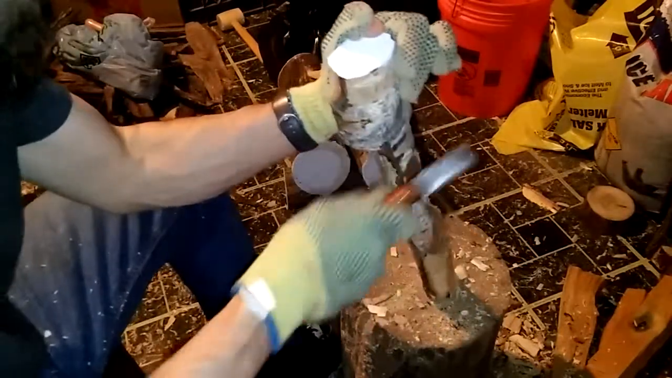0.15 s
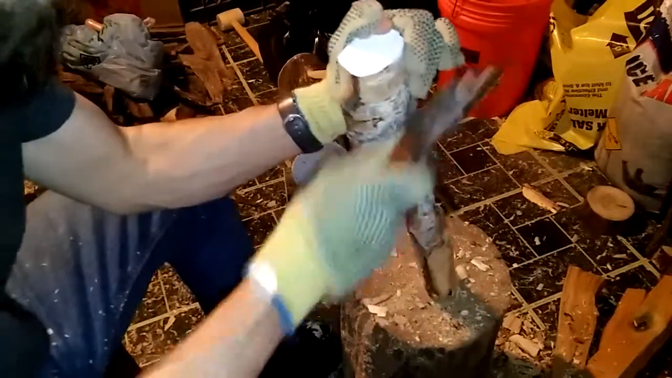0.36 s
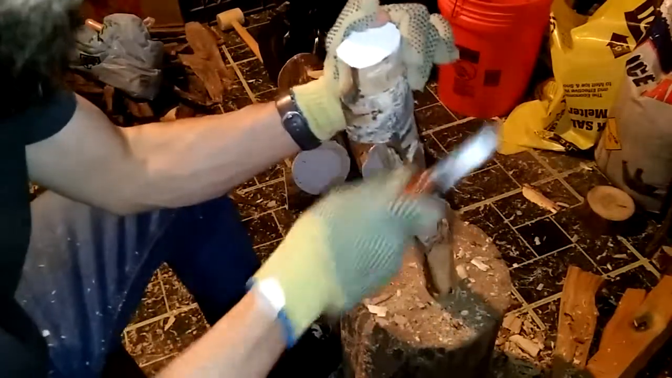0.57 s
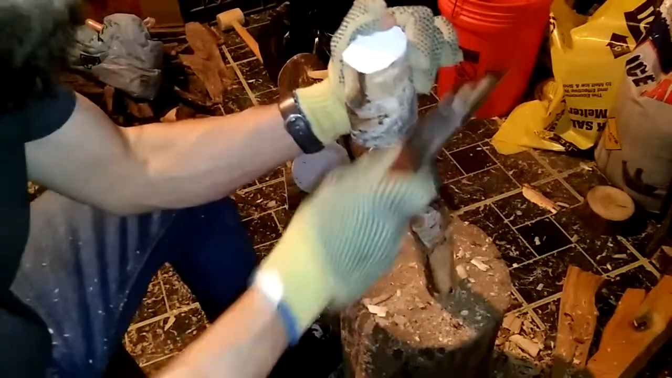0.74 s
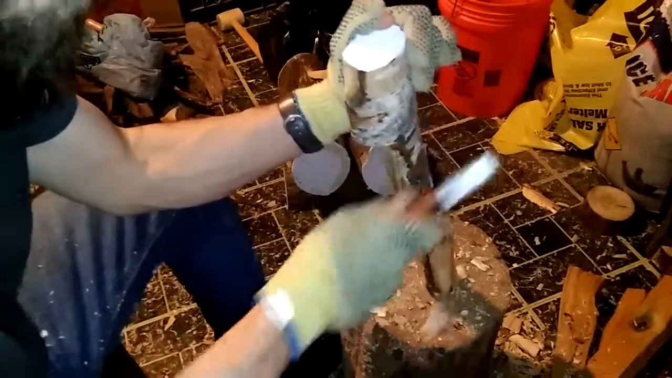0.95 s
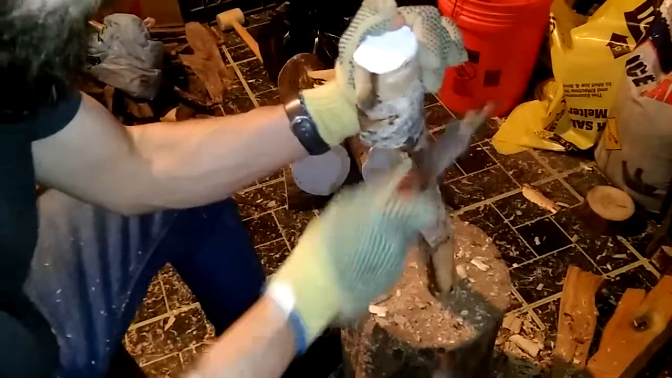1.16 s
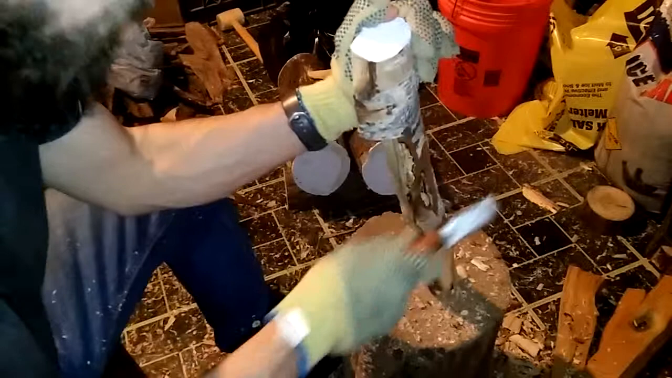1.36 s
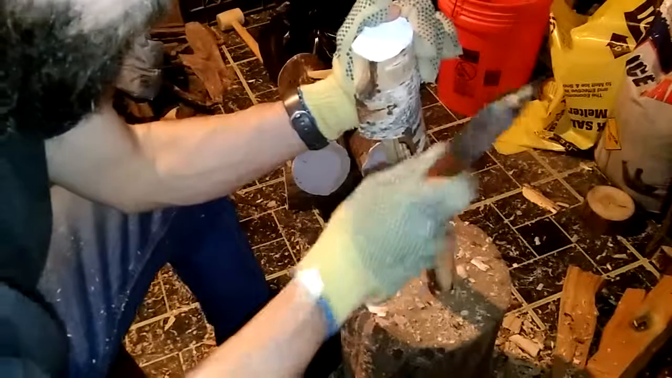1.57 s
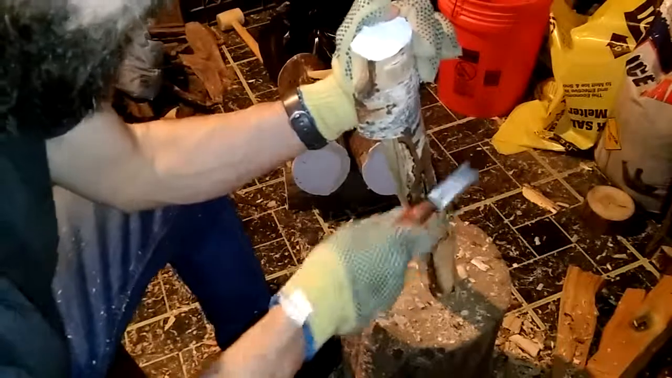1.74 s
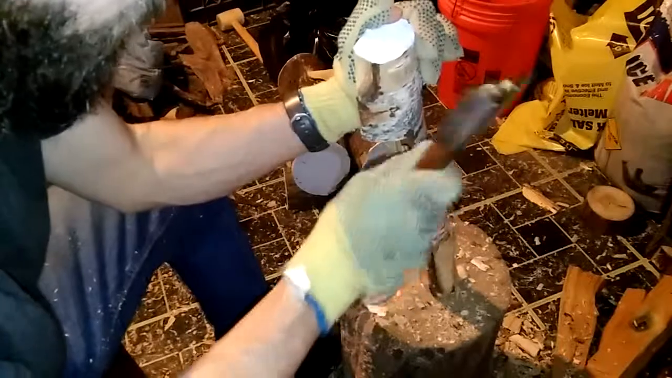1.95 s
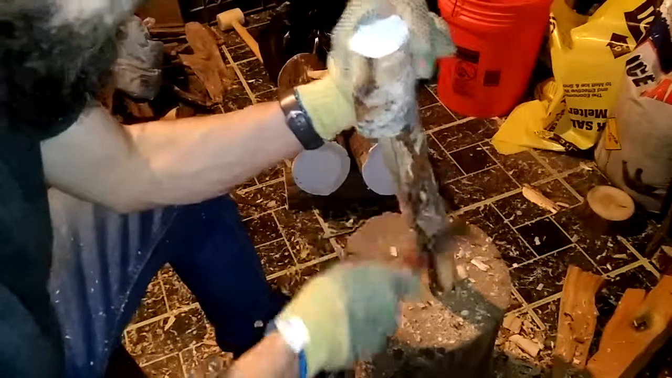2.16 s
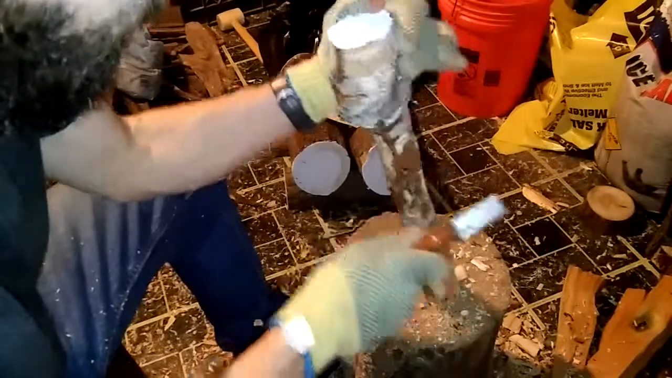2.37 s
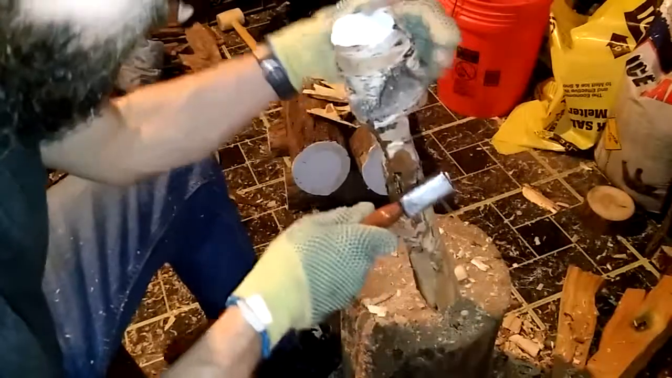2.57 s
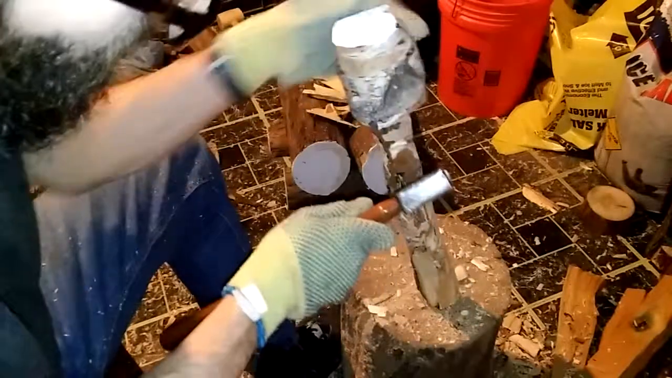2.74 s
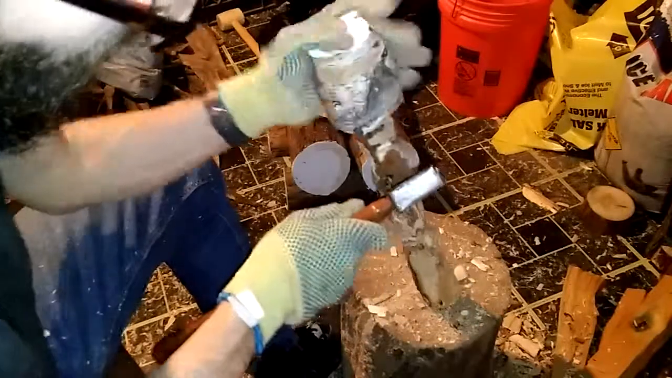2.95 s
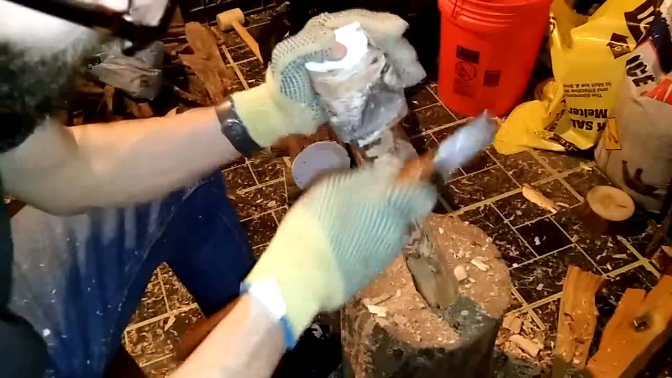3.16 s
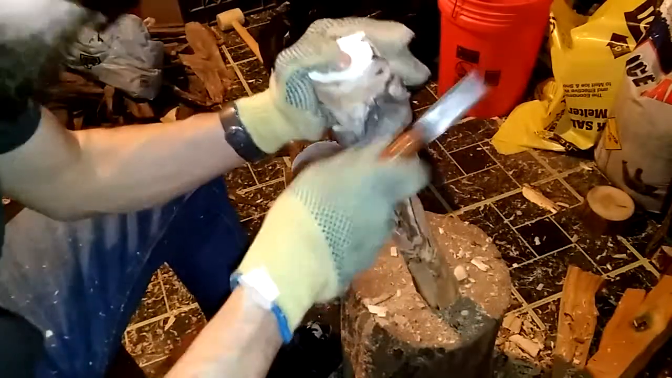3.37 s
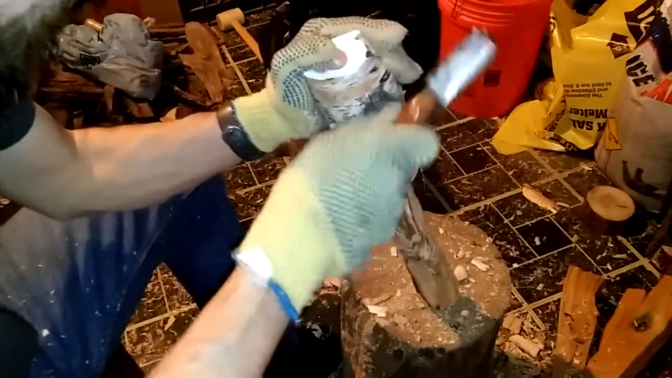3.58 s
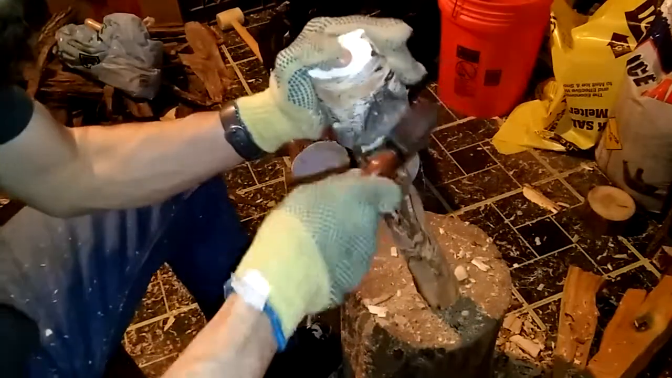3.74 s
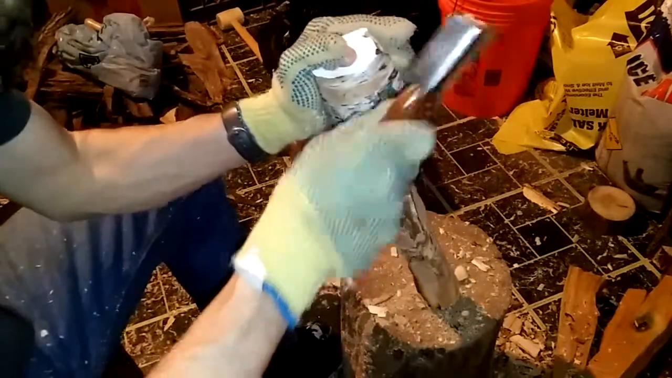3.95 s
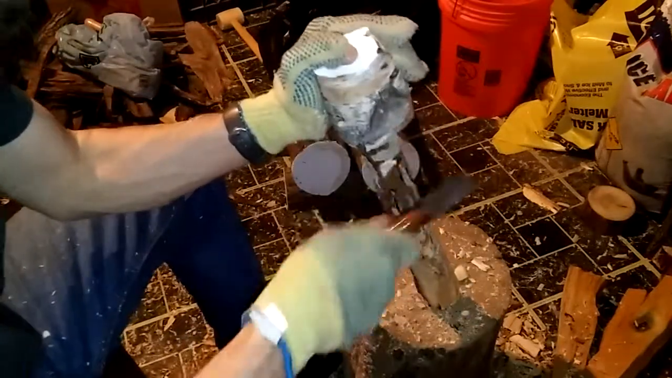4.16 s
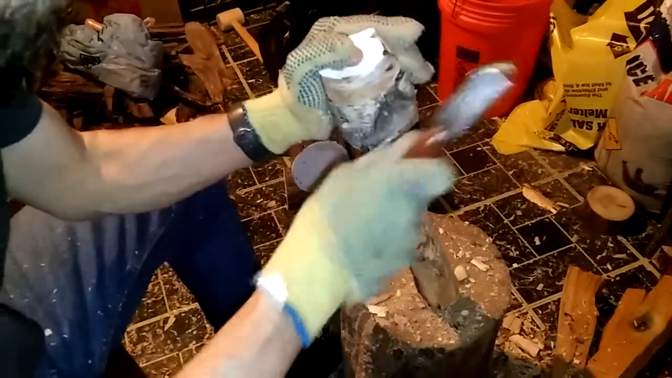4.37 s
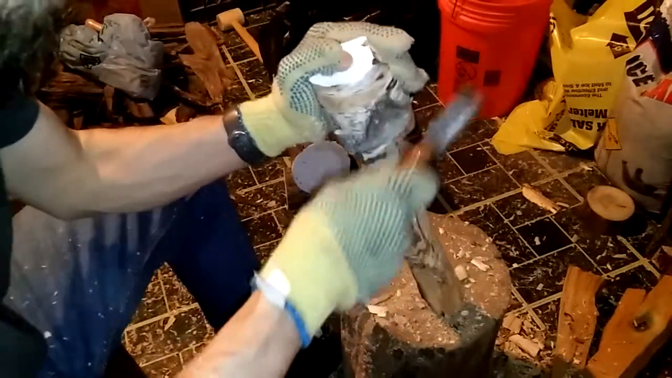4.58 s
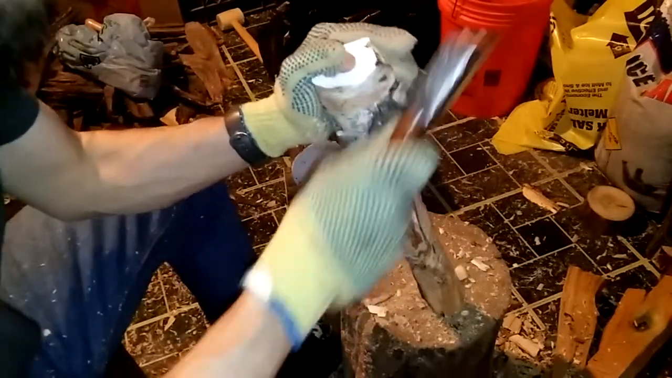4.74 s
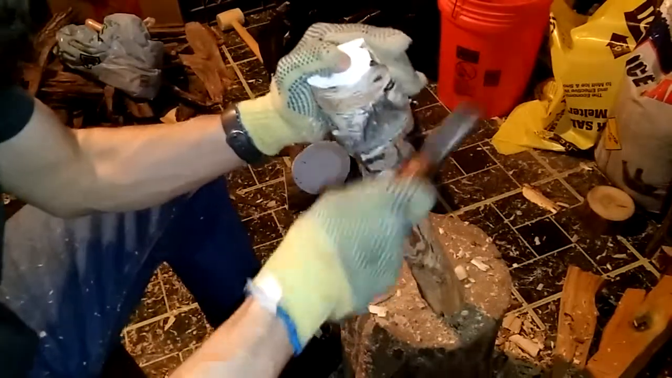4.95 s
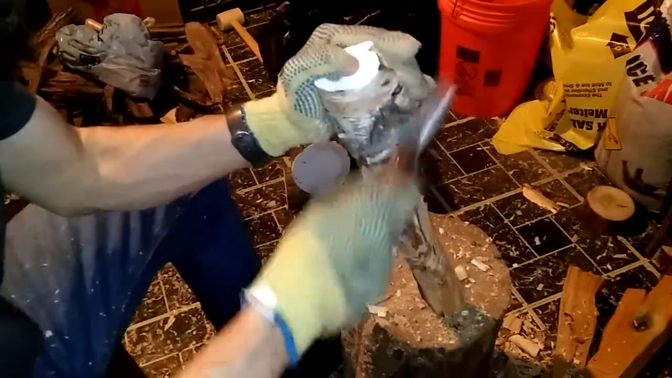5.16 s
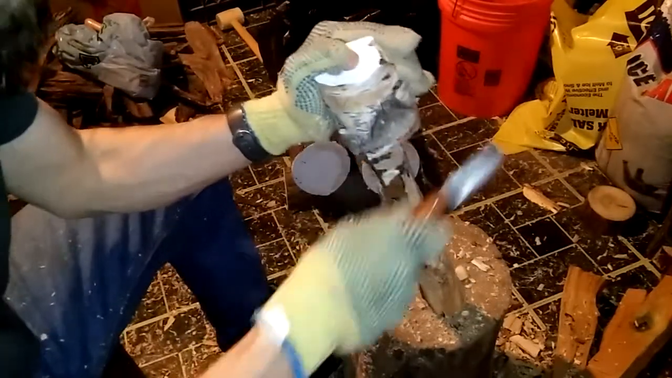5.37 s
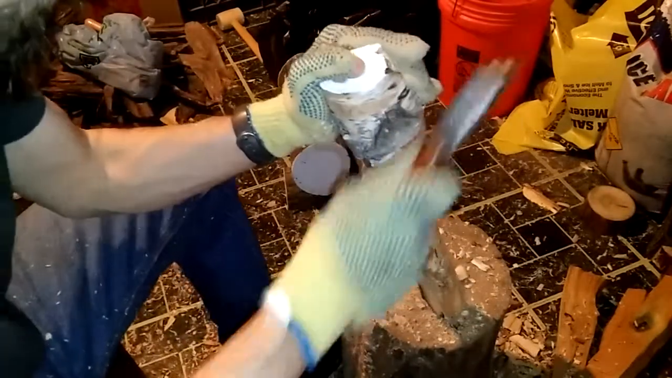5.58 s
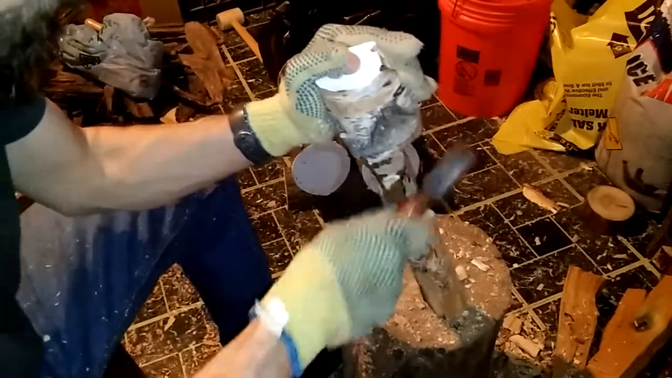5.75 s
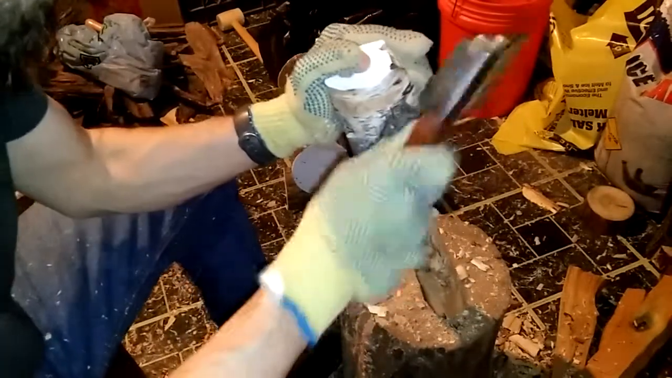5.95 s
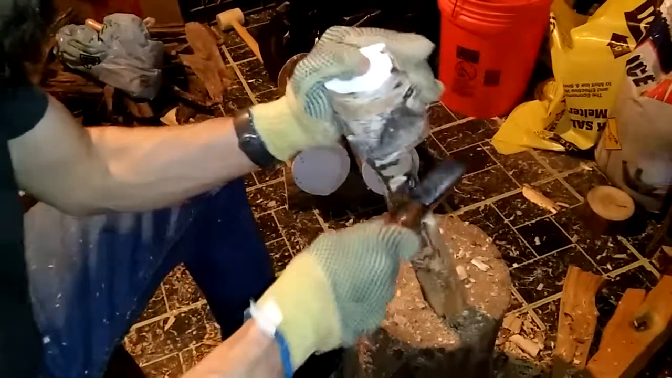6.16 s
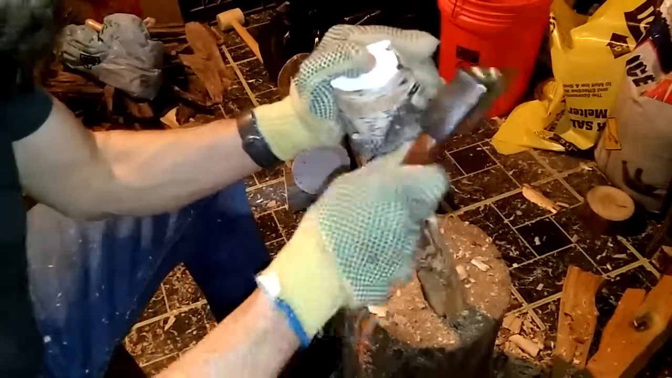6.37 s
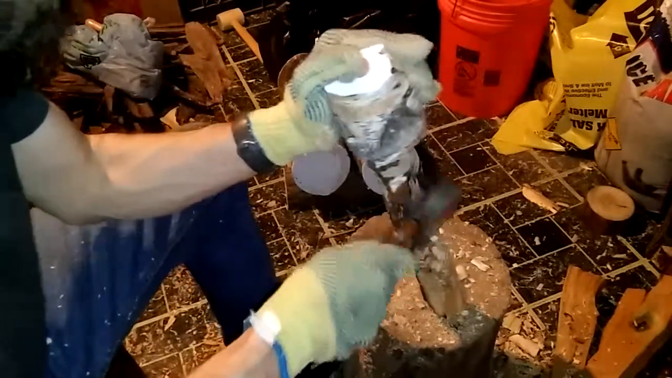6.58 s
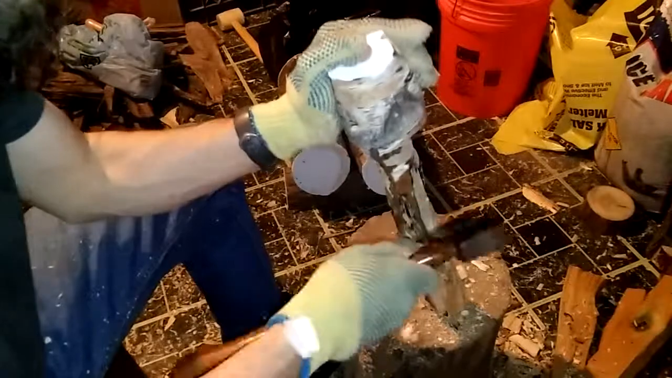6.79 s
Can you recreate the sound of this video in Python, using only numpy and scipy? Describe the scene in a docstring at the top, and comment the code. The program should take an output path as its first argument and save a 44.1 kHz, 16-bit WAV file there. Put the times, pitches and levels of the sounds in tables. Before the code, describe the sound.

Sharp hatchet chops crack into wood with a faint steel ring, pause briefly, then resume as splinters fall on wood and tiles.

```python
"""A hatchet shaves a short log held upright on a stump, an arm's length from the microphone.
Each bite knocks log and stump, tears fibres and rings the steel head; thick fibres snap singly.
Chips and offcuts drop around the stump, ticking and knocking on wood and tiles.
The place is a small cluttered workshop with short echoes, in mono. Low hum and hiss lie behind,
ducked by the recorder's noise suppression in pauses and just before blows."""
import sys
import numpy as np
from scipy import signal
from scipy.fft import rfft, irfft
from scipy.io import wavfile
from scipy.ndimage import uniform_filter1d

SR = 44100
rng = np.random.default_rng(int(sys.argv[2]) if len(sys.argv) > 2 else 0)


def wrap_up_sound(samples):
    """Save the sound to the file named by the first command line argument, as 16-bit audio."""
    columns = np.atleast_2d(samples).T
    # keep every value between -1 and 1, then stretch to whole-number steps
    tamed = np.clip(columns, -1, 1)
    steps = np.round(tamed * 32767).astype(np.int16)
    wavfile.write(sys.argv[1], SR, steps)


N = 300762


def undb(db):
    """Gain of a dB value."""
    return 10 ** (np.asarray(db) / 20)


def peak(x, db):
    """Scale to a peak level."""
    return x * undb(db) / np.max(np.abs(x))


def clock(s):
    """Time axis of s seconds."""
    return np.arange(int(s * SR)) / SR


def add(track, s, x):
    """Mix a sound in at time s."""
    i = int(s * SR)
    track[i:i + len(x)] += x[:N - i]


def band(x, hz, *widths):
    """Two-pole resonances in series, one per width in Hz, gain 1 at the centre."""
    for width in widths:
        x = signal.lfilter(*signal.iirpeak(min(hz, SR / 2.2), hz / min(width, SR / 3), fs=SR), x)
    return x


def drop_bass(x):
    """Log, hatchet and chips are too small to radiate deep bass."""
    return signal.sosfilt(signal.butter(6, 135, "high", fs=SR, output="sos"), x)


def coloured(points):
    """Unit noise with a spectrum of (Hz, dB) points."""
    hz, db = np.transpose(points)
    bins_hz = np.arange(N // 2 + 1) * SR / N + 1
    shape = undb(np.interp(np.log(bins_hz), np.log(hz), db))
    x = irfft(rfft(rng.standard_normal(N)) * shape, N)
    return x / np.std(x)


def wander(rate):
    """Random levels held 1 / rate s and smoothed twice; spread 1."""
    hold = int(SR / rate)
    steps = np.repeat(rng.standard_normal(N // hold + 1), hold)
    x = uniform_filter1d(uniform_filter1d(steps, hold), hold)[:N]
    return x / np.std(x)


# Low hum and hiss, ducked by the recorder's noise suppression in pauses and just before blows:
# (time [s], hum level [dB], hiss level [dB])
DUCKED_FLOOR = [(0.0, -56, -54.5), (0.13, -64.5, -63.5), (2.24, -62, -57), (2.56, -70, -73),
                (2.94, -71, -70), (3.21, -63.5, -68.5), (3.34, -60.5, -64), (3.78, -63, -58),
                (3.97, -92, -77.5), (4.18, -63.5, -62), (4.42, -62, -63.5), (4.98, -66, -65),
                (5.13, -61.5, -59), (5.43, -60, -58.5), (5.68, -69, -77.5), (6.27, -67, -63),
                (6.44, -60, -60), (6.82, -65.5, -67)]
def floor_gain(column, swell_db, rise_s):
    """Gain of hum or hiss: the listed ducking plus a swell after each bite, relative to the thud."""
    rows = np.array(DUCKED_FLOOR)
    power = undb(np.interp(np.arange(N) / SR, rows[:, 0], rows[:, column])) ** 2
    age = clock(1) / rise_s
    for s, thud_db, *_ in BITES:
        swell = undb(thud_db + swell_db) * age * np.exp(1 - age)
        add(power, s, swell ** 2)
    return np.sqrt(power)


# Spectrum of the hum: (frequency [Hz], relative density [dB])
HUM_SPECTRUM = [(18, -47.5), (30, -30.5), (55, -7), (123, 6), (200, -2), (265, 2.5), (744, -5),
                (1600, -10.5), (2080, -34.5), (3520, -120)]
# Low notes within it: (frequency [Hz], width [Hz], relative level [dB])
HUM_NOTES = [(62, 14, -9), (93, 14, -3.5), (240, 12, -13)]
def hum():
    """Wavering low noise with narrow bands of noise as notes."""
    low = coloured(HUM_SPECTRUM) * undb(3.2 * wander(25))
    for hz, width, db in HUM_NOTES:
        note = band(rng.standard_normal(N), hz, width)
        low += undb(db) * note / np.std(note)
    return low


# Spectrum of the hiss: (frequency [Hz], relative density [dB])
HISS_SPECTRUM = [(710, -32.5), (1200, -23.5), (1700, -5), (1890, -9), (2270, -9), (3590, -11.5), (6030, -7),
                 (16000, -14)]
def hiss():
    """Bright noise whose level flickers."""
    flicker_db = 1.5 * wander(30) + 1.5 * wander(300)
    return coloured(HISS_SPECTRUM) * undb(flicker_db)


def crumbs(hiss_gain, count=40, centre_hz=6800, octaves=0.38):
    """Rows for chip(): faint ticks at chance moments, 10 dB or more over the hiss."""
    when, size, pitch = rng.random((count, 3)).T
    db = 20 * np.log10(hiss_gain[(when * N).astype(int)]) + 10 - 1.5 * np.log(1 - size)
    hz = centre_hz * 2 ** (octaves * (2 * pitch - 1))
    return zip(when * N / SR, db, hz, np.full(count, .4))


# The workshop's echo by band: (frequency [Hz], t60 [s], relative level [dB])
ECHO_BANDS = [(108, 1, -19.5), (330, 0.34, -3), (785, 0.24, -7.5), (2920, 0.34, -11.5), (6070, 0.18, -6.5),
              (12800, 0.058, -16)]
def echoes():
    """Dense echoes reach the microphone within a few ms and die band by band, the bass last."""
    t = clock(.7)
    tail = 0
    for hz, t60, db in ECHO_BANDS:
        noise = band(rng.standard_normal(len(t)), hz, 2.3 * hz, 2.3 * hz)
        part = noise * np.exp(-np.log(1000) * t / t60) * (1 - np.exp(-t / 0.0014))
        tail += 2 * undb(db) * np.sqrt(hz / SR) * part / np.linalg.norm(part)
    return drop_bass(tail)


def rattle(t60):
    """A burst of noise that falls 60 dB in t60 seconds."""
    t = clock(.2)
    return rng.standard_normal(len(t)) * np.exp(-np.log(1000) * t / t60) * (1 - np.exp(-t / 0.00065))


# Offcuts landing around the stump: (time [s], level [dB], pitch [Hz], width [share of pitch])
OFFCUTS = [(.3822, -49.5, 436, 0.54), (.4883, -47, 2350, 0.13), (.6978, -47, 393, 0.35),
           (1.1024, -33.5, 1180, 0.27), (1.4905, -38.5, 616, 0.34), (2.0565, -42, 1060, .4),
           (2.3033, -30.5, 330, 0.63), (2.3472, -43, 662, 0.46), (3.7245, -36.5, 507, 0.14),
           (4.4035, -52, 377, 0.29), (4.4542, -58, 374, .3), (5.1317, -48.5, 509, .3),
           (5.198, -27.5, 430, 0.14), (6.3274, -56, 334, 0.33), (6.655, -26, 963, 1),
           (6.6764, -35.5, 1780, 0.38)]
def offcut(db, hz, width):
    """A heavier piece lands with a small wooden knock."""
    width_hz = np.clip(width, .02, 1.5) * hz
    return peak(band(rattle(t60=0.052), hz, width_hz, 3 * width_hz), db)


# Chips landing on wood and tiles: (time [s], level [dB], pitch [Hz], width [share of pitch])
CHIP_FALLS = [(.0544, -37.5, 5900, .53), (.128, -43.5, 6690, 0.29), (.4676, -48, 6230, .4),
              (.4883, -37, 7480, .65), (.6978, -27, 7200, .24), (.79, -46.5, 6000, .4),
              (.807, -38, 5750, .4), (1.1024, -30, 4630, .57), (1.194, -42, 6490, .4),
              (1.2441, -41, 7800, .4), (1.2989, -26, 3670, 1.1), (1.3329, -16.5, 4400, .73),
              (1.4905, -17, 4384, .47), (2.032, -33.5, 6040, .54), (2.05, -45, 6500, .4),
              (2.0565, -28.5, 5500, 1.1), (2.1236, -39, 8200, .4), (2.1466, -35, 5800, 0.37),
              (2.17, -41, 11000, .7), (2.2013, -44, 9400, .6), (2.211, -41.5, 11000, 0.77),
              (2.2623, -42, 5210, .4), (2.3472, -34, 2390, .6), (2.3929, -47, 7700, .3),
              (2.446, -34.5, 10460, 0.59), (2.9515, -46, 5830, .4), (3.4173, -38, 2450, .15),
              (3.7245, -25, 5040, .04), (4.151, -45, 8300, .44), (4.165, -47.5, 6500, .5),
              (4.3686, -37, 4500, 1.1), (4.3859, -42, 7200, .4), (4.4035, -35, 6200, .45),
              (4.4542, -45, 7360, .61), (5.1317, -38.5, 7100, .35), (5.199, -25.5, 4840, 0.054),
              (5.2689, -37, 5800, .4), (5.3036, -28.5, 3460, .64), (5.36, -36.5, 4500, .9),
              (5.6077, -45, 7670, .4), (6.1742, -46, 4350, .06), (6.193, -46.5, 7000, .3),
              (6.2128, -51, 8340, .81), (6.3274, -31.5, 3860, .4), (6.5006, -32, 7000, .9),
              (6.544, -35.5, 6540, .4), (6.5638, -38, 7600, .37), (6.6306, -31.5, 6600, .31),
              (6.655, -33.5, 2360, .44)]
def chip(db, hz, width):
    """A light splinter lands: a dry tick with a short ring."""
    t = clock(.2)
    touch = rng.standard_normal(len(t)) * np.exp(-t / 0.00043)
    width_hz = np.clip(width, .01, 1.5) * hz
    tick = band(touch, hz, 0.83 * width_hz, 1.5 * width_hz)
    tail = band(rattle(t60=.03), hz, width_hz, 2 * width_hz)
    return peak(peak(tick, -3.1) + peak(tail, -1), db)


# Thick fibres breaking during a cut: (time [s], level [dB])
FIBRE_SNAPS = [(.1901, -11.5), (.2117, -1), (.5915, -25), (.9728, -5.5), (1.4385, -4), (1.8437, -1.5),
               (3.4868, -1.5), (3.8155, -3), (4.5852, 3), (4.959, -6.5), (6.2644, -9), (6.2725, -3)]
def snap(db, hz=7600):
    """One fibre parts with a click of under a millisecond."""
    t = clock(.01)
    burst = rng.standard_normal(len(t)) * t * np.exp(-t / .00012)
    return peak(band(burst, hz, 0.82 * hz, 3 * hz), db)


def ring(drive, modes, scatter_db, stretch):
    """Damped modes, t60 times stretch; every blow lands elsewhere, so strengths and tuning scatter."""
    out = 0
    for hz, db, t60 in modes:
        detune, strength = rng.standard_normal(2)
        radius = np.exp(-np.log(1000) / (max(stretch, .1) * t60 * SR))
        angle = 2 * np.pi * hz * (1 + 0.007 * detune) / SR
        mode = signal.lfilter([0, 1], [1, -2 * radius * np.cos(angle), radius ** 2], drive)
        out += peak(mode, db + scatter_db * strength)
    return out


def register(drive, modes, lo, hi, db, contact_db, stretch):
    """A body's modes from lo to hi Hz, with the broad sound of the contact itself."""
    ringing = ring(drive, [m for m in modes if lo <= m[0] < hi], 1.5, stretch)
    contact = band(drive, np.sqrt(lo * hi), hi - lo, 2 * (hi - lo))
    return peak(peak(ringing, 0) + peak(contact, contact_db), db)


# Modes of the stump: (frequency [Hz], relative level [dB], t60 [s])
STUMP_MODES = [(62, -18.5, 0.5), (92.5, -18, .5), (146, -11, 0.08), (164.6, 1.5, 0.19), (216, -3.5, 0.17)]
def stump(ms, db):
    """The heavy stump and the floor under it take the blow late and softly."""
    load = ms / 16 * np.exp(-ms / 16) * band(rng.standard_normal(len(ms)), 200, 200)
    return peak(ring(load, STUMP_MODES, scatter_db=0.83, stretch=1), db)


# Modes of the upright log: (frequency [Hz], relative level [dB], t60 [s])
LOG_MODES = [(310, -11, 0.028), (390, -3, 0.088), (440, 4.5, 0.18), (527, 2, 0.025), (626.4, -2, 0.12),
             (760, 0.5, 0.0073), (927, -9, 0.086), (1005, 1.5, 0.018), (1539, -5, 0.071), (1620, -1, 0.033),
             (1895, -15, .015)]
def wood(ms, fibres, thud_db, knock_db):
    """The first shove and the tearing fibres shake the log: a low thud and a higher knock."""
    shove = np.sin(np.pi * np.minimum(ms / 0.5, 1))
    shake = peak(shove, -2.5) + peak(band(fibres, 1000, 2200), 6.3)
    thud = register(shake, LOG_MODES, 200, 700, thud_db, contact_db=4, stretch=0.78)
    knock = register(shake, LOG_MODES, 700, 2000, knock_db, contact_db=5, stretch=0.93)
    return thud + knock


# Long bending tones of the blade: (frequency [Hz], relative level [dB], t60 [s])
BLADE_MODES = [(3784, -2, 0.043), (6163, -3.5, 0.07), (6330, -10, 0.056)]
# Modes of the steel head: (frequency [Hz], relative level [dB], t60 [s])
HEAD_MODES = [(2366, -11, 0.12), (2610, -0.5, 0.015), (3530, -18, 0.046), (3624, -5.5, 0.033),
              (4290, -3, 0.014), (5300, -5.5, 0.0069), (6495, -1.5, 0.0097), (7430, -8.5, 0.007),
              (8340, 0, .005), (10410, -14.5, 0.0098)]
def steel(fibres, db, bright_db, stretch, blade_db):
    """Tearing fibres ring the blade and three registers of the head."""
    out = undb(blade_db) * ring(fibres, BLADE_MODES, 1.9, stretch)
    out += register(fibres, HEAD_MODES, 2000, 4600, db, 4.5, stretch)
    out += register(fibres, HEAD_MODES, 4600, 7000, db - 5 + .4 * bright_db, -4.5, stretch)
    out += register(fibres, HEAD_MODES, 7000, 11000, db + bright_db, -5.5, stretch)
    return out


# The edge at arm's length, each first contact, further jolt or light touch:
# (time [s], log thud [dB], log knock [dB], steel level [dB], steel's top over its low register [dB],
#  cut length [ms], steel decay stretch [factor], blade gain [dB])
BITES = [(0.1814, -24.5, -19, -7, -0.5, 11.3, 1.2, -18.5), (0.1969, -19.5, -25, -23, -2, 8.1, .39, -6),
         (0.5587, -13, -12.5, -7.5, 6.5, 10.6, 2.2, -22), (0.5832, -28, -24, -23, -5, 3.9, 0.24, -5),
         (0.597, -36, -23.5, -12, 1, 5.7, 0.36, -40.5), (0.939, -41.5, -37, -40, -3.5, 26, 0.35, -64.5),
         (0.9692, -23, -24, -14.5, 13.5, 15.3, 0.42, -21.5), (.977, -13.5, -10, -20.5, 9.5, 2.55, 1.2, -8),
         (.985, -18, -26, -7, -8.5, 2.7, 0.64, -15.5), (1.4339, -11.5, -3, -0.5, -5.5, 5.8, 0.23, -19),
         (1.8301, -19, -2, -2, -4.5, 6.3, 0.34, -16), (1.8413, -17.5, -8.5, -2.5, -9, 11.9, 0.65, -16),
         (3.165, -27, -30.5, -42.5, 15.5, 7, 0.47, -11.5), (3.171, -12.5, -19, -8, -2, 2.63, 1.53, -33.5),
         (3.4732, -17.5, -12, -16, -11.5, 10.4, 0.82, -30.5), (3.481, -21, -29, -11.5, 6.5, 6, 1.3, -11),
         (3.8015, -15.5, -18.5, -23, 7, 3.3, 1.8, -19), (3.8093, -18, -13.5, -14, -32, 1.47, 0.42, -29),
         (3.8135, -17.5, -18, -11.5, -3.5, 11.2, 0.83, -15.5), (4.2151, -12, -9, -6.5, -5, 6.5, 0.63, -32),
         (4.5653, -18, -13, -7.5, -7, 5.3, 1.5, -13.5), (4.57, -19.5, -15, -10.5, -3.5, 8.2, 0.76, -12),
         (4.938, -17, -4, -7.5, -5.5, 4, 1.07, -20), (4.9584, -17.5, -21, -15, -10.5, 24.3, 0.26, -21.5),
         (5.199, -47, -33, -23, -18.5, 6.1, 0.33, -30), (5.4165, -11.5, -10, -13, 7.5, 2.05, 0.47, -23),
         (5.4201, -16.5, -10, -7, 1.5, 5.6, 0.13, -24.5), (5.8255, -20, -19, -13.5, -6.5, 22.2, 0.51, -15),
         (6.2467, -19, -23, -13.5, -4, 17.5, 1.7, -20.5), (6.2631, -13, -9.5, -13, 7, 3.7, 0.45, -28.5),
         (6.268, -14, -21, -14, -16, 4.3, 1.9, -18.5)]
def hatchet(thud_db, knock_db, steel_db, bright_db, cut_ms, stretch, blade_db):
    """The edge strikes, then ploughs on through tearing fibres that shake log and steel."""
    ms = 1000 * clock(.5)
    rise_ms = 1.4 * 2 ** ((thud_db - knock_db) / 16)  # quicker the more the knock tops the thud
    force = (1 - np.exp(-ms / rise_ms)) * np.exp(-(ms / max(cut_ms, .2)) ** 1.5)
    fibres = force * rng.standard_normal(len(ms))
    fibres *= undb(2.1 * rng.exponential(size=len(ms)))  # they part in very uneven sizes
    log = wood(ms, fibres, thud_db, knock_db)
    head = steel(fibres, steel_db, bright_db, stretch, blade_db)
    tearing = peak(band(band(fibres, 13000, 6000), 16000, 9000), steel_db + bright_db - 4.5)
    return drop_bass(log + head + tearing) + stump(ms, thud_db - 19)


def scene(spots=6):
    """At the microphone: the work sounds from shifting spots, each with its echoes, over hum and hiss."""
    hum_gain = floor_gain(column=1, swell_db=-46, rise_s=0.027)
    hiss_gain = floor_gain(column=2, swell_db=-43.5, rise_s=0.048)
    direct = np.zeros((spots, N))
    for table, source in [(BITES, hatchet), (FIBRE_SNAPS, snap), (CHIP_FALLS, chip),
                          (OFFCUTS, offcut), (crumbs(hiss_gain), chip)]:
        for k, (s, *settings) in enumerate(table):
            add(direct[k % spots], s, source(*settings))
    room = sum(signal.fftconvolve(spot, echoes())[:N] for spot in direct)
    noise_floor = hum() * hum_gain + hiss() * hiss_gain
    return (direct.sum(axis=0) + room + noise_floor)[None]


def record(dry, bass_hz=58, top_hz=15900):
    """The loudest peaks are rounded; the recorder drops the deep bass and cuts the top."""
    rounded = np.tanh(dry)
    thinned = signal.sosfilt(signal.butter(4, bass_hz, "high", fs=SR, output="sos"), rounded)
    return signal.sosfilt(signal.ellip(10, .2, 80, top_hz, fs=SR, output="sos"), thinned)


dry = scene()
out = record(dry)
wrap_up_sound(out)
```